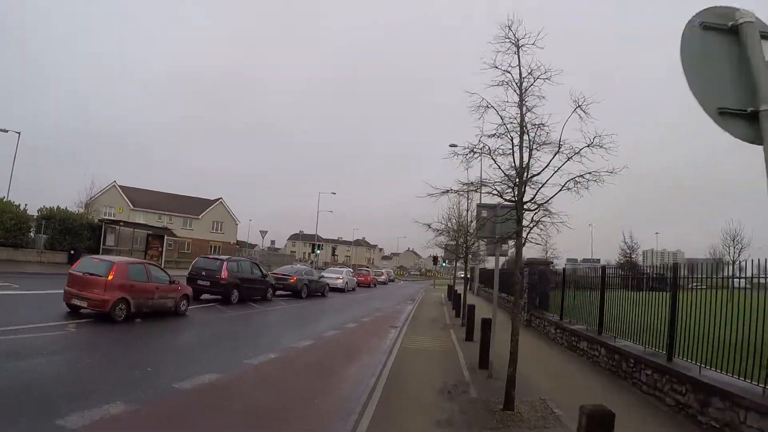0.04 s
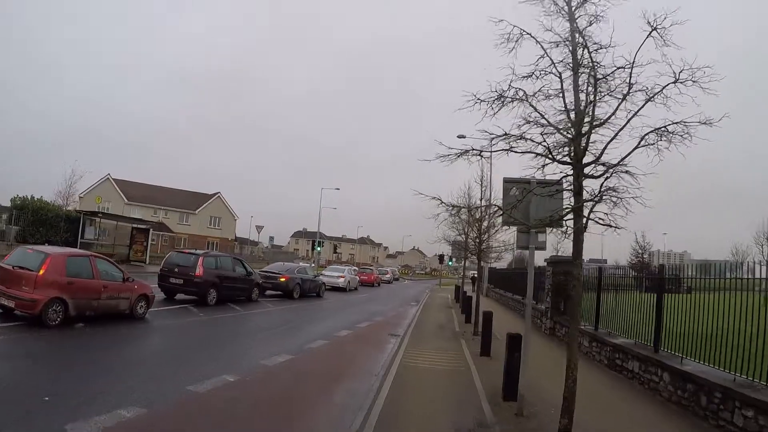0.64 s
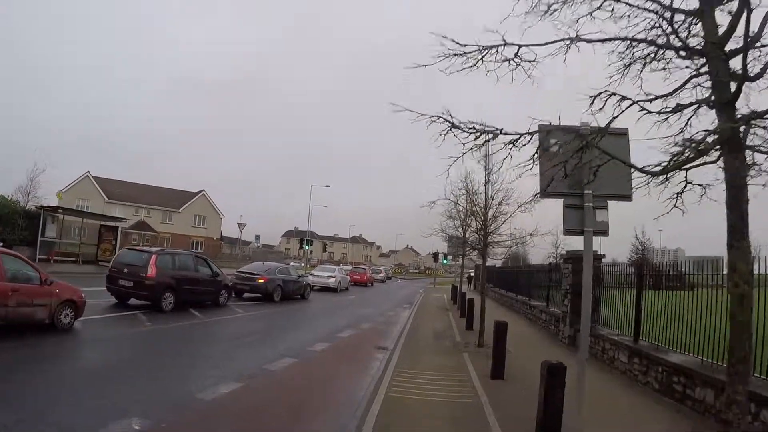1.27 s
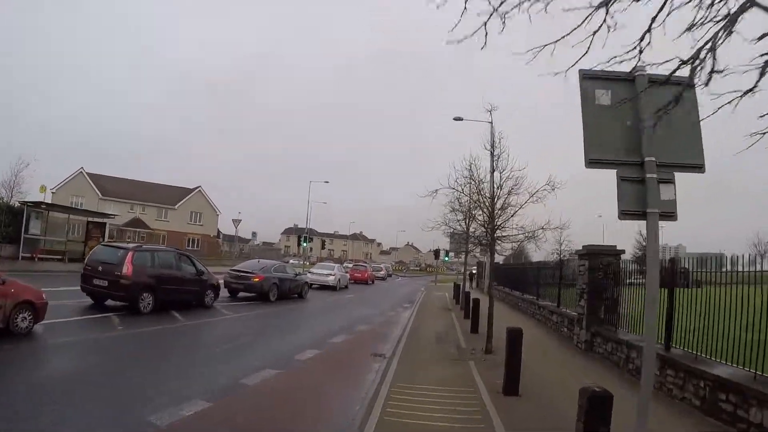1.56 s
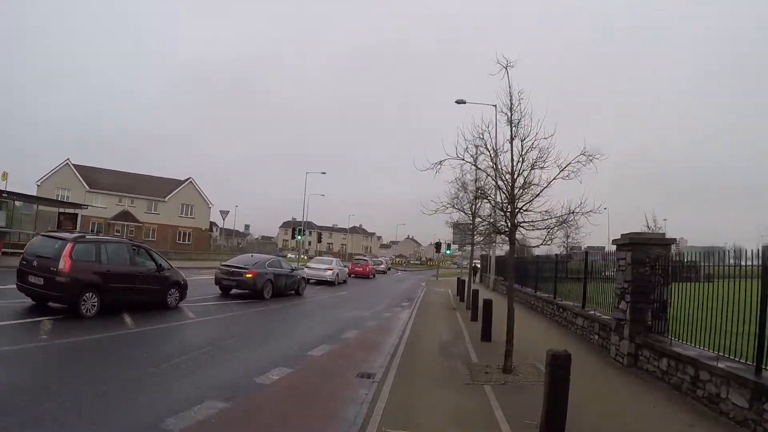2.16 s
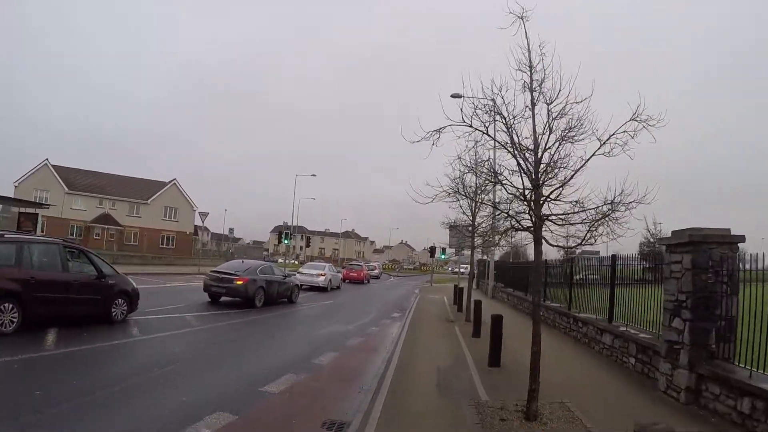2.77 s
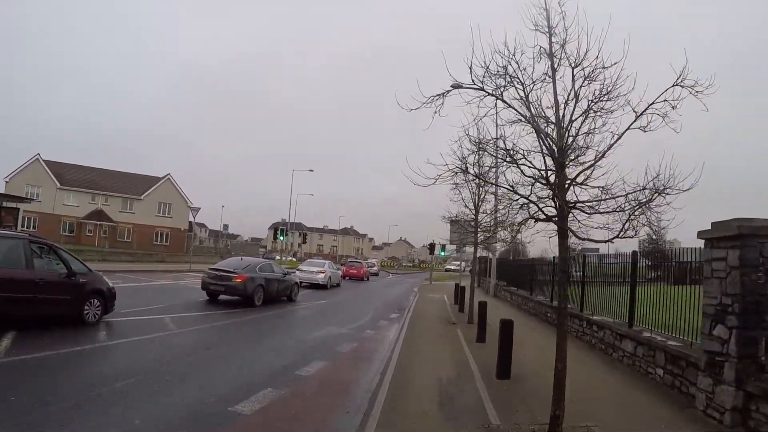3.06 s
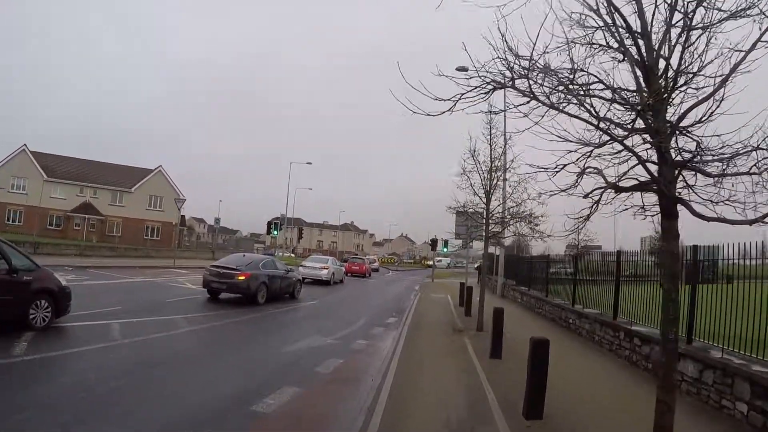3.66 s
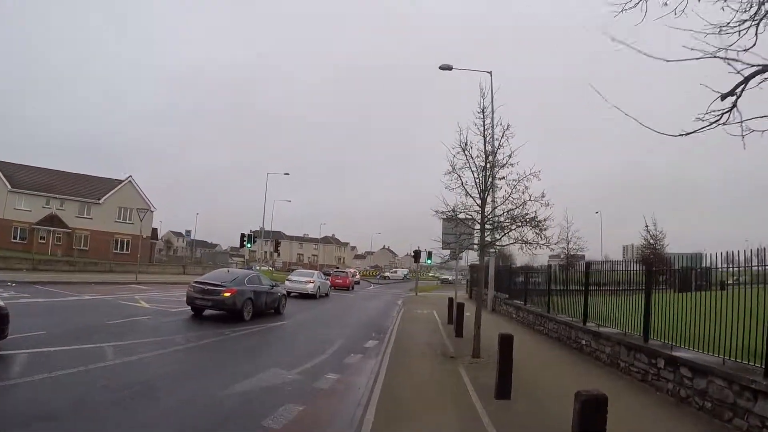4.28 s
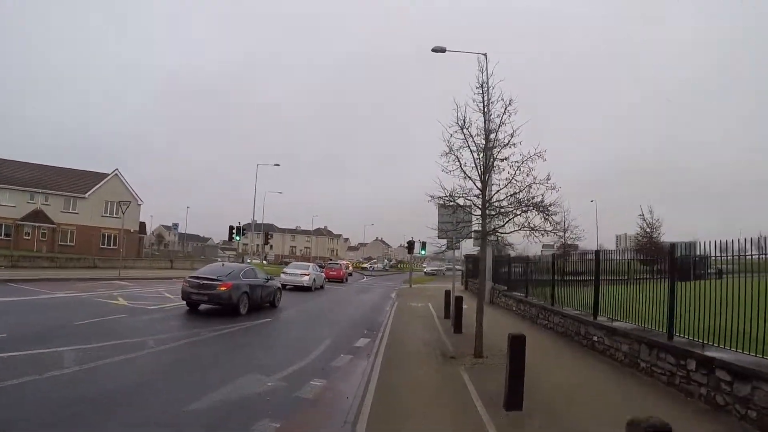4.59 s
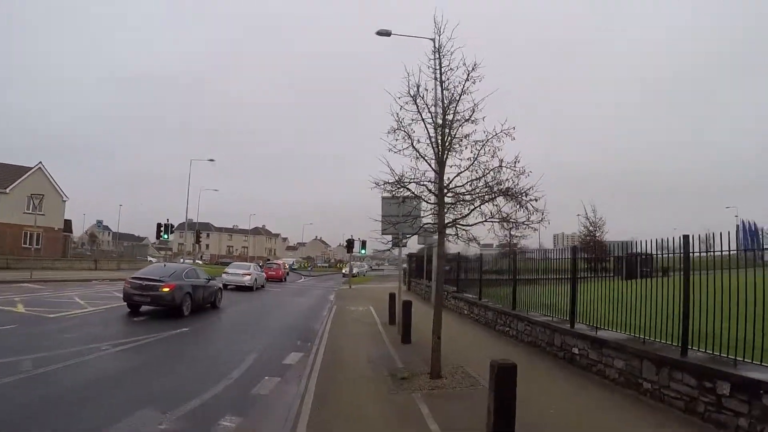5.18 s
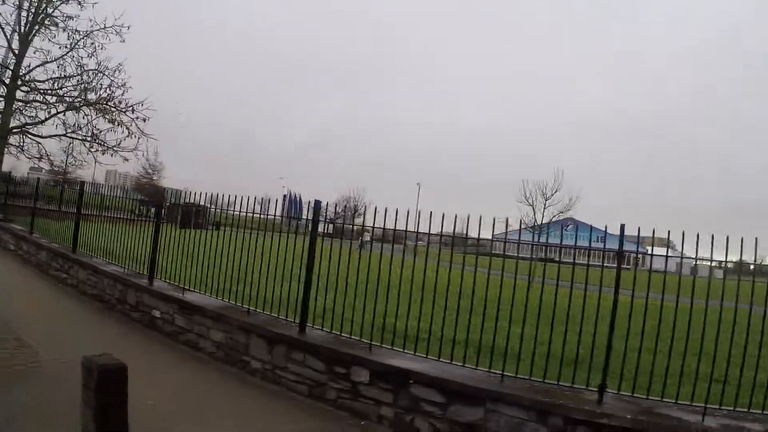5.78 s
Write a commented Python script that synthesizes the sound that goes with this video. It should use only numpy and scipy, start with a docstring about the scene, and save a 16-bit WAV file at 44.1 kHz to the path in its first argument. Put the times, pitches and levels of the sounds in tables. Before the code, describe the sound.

A ride along a cycle path beside a wet street, heard from a camera in a hard housing. Gusty low wind and throbbing engines run throughout, with slightly hollow tyre noise rising and falling from the road. One sharp bicycle click stands out before the middle, then the wind gusts harder. Very faint high pips and small scuffs sit in the background, and a short, low whoosh comes just before the end.

```python
"""Cycling past wet traffic

One microphone, in a camera's hard housing, rides a cycle path past idling cars on a wet road.
Up close, wind buffets the housing over the engines' rumble; from the road, tyres roar, sing and spray,
their noise coloured by the housing's resonances. The bicycle gives one sharp click, faint ticks and
scuffs; thin pips twitter far up in the treble. Near the end, air whooshes low as the camera swings."""
import sys
import numpy as np
from scipy import signal
from scipy.fft import irfft
from scipy.io import wavfile
from scipy.ndimage import uniform_filter1d

SR = 44100
rng = np.random.default_rng(int(sys.argv[2]) if len(sys.argv) > 2 else 0)


def dump(signal):
    """Clip the signal to [-1, 1] and save it as 16-bit WAV at the path in sys.argv[1]."""
    limited = np.clip(np.atleast_2d(signal).T, -1, 1)
    pcm = np.round(limited * 32767).astype(np.int16)
    wavfile.write(sys.argv[1], SR, pcm)


N = 266364
TIME = np.arange(N) / SR
BINS = np.fft.rfftfreq(N, 1 / SR)

# gusts on the housing, before the wind's trim: peak_s, length_s, level_db
HOUSING_GUSTS = [(0.21, 0.28, -43), (0.606, 0.25, -39.5), (1.1, .1, -41.5), (1.392, .12, -40),
                 (1.927, .3, -42.5), (2.712, 0.35, -39.5), (3.3, 0.23, -37), (3.578, .28, -33.7),
                 (3.872, .1, -38.5), (4.729, .13, -38.5), (5.315, .28, -40)]
# idling cars beside the path, before the hum's trim: nearest_s, fall_3db_s, pitch_hz, level_db
IDLING_CARS = [(1.5, 1.0, 149.9, -57.5), (2.1, 0.28, 218.3, -63), (4.45, 0.45, 151.9, -57)]
# engines further up the road, before the hum's trim: pitch_hz, level_db
FAR_ENGINES = [(112, -61), (212, -80), (275, -77.5)]
# cars rolling by, before the tyres' trims: nearest_s, fall_3db_s, roar_db, tread_db, spray_db
PASSING_CARS = [(.06, -0.06, -60.5, -63, -71), (.62, 0.44, -58, -73, -75), (.95, 0.22, -63, -65, -68.5),
                (1.85, 0.39, -62, -66.5, -73), (2.53, .2, -64.5, -56, -80), (2.87, 0.47, -64, -74, -81.5),
                (5.87, 0.23, -75, -62.5, -64)]
# tread blocks singing on the asphalt: loudest_s, fall_3db_s, pitch_hz, level_db
TREAD_SONGS = [(.068, .02, 1233, -55), (.68, 0.36, 1220, -63), (1.1, 0.17, 1770, -65),
               (2.25, 0.22, 1751, -65), (5.75, 0.27, 1162, -66), (5.9, .2, 1764, -66)]
# resonances and hollows of the housing around the microphone: centre_hz, width_hz, gain_db
HOUSING_RESONANCES = [(559, 55, 7), (834, 32, -7), (918, 52, 3.5), (1218, 120, -1.5), (1738, 187, 5.5),
                      (2072, 90, -5.5), (2267, 216, 4), (2683, 184, -5), (2840, 180, 1), (3550, 360, 0.5),
                      (4240, 300, -4), (4525, 400, 5)]
# clicks of the bicycle, close by: start_s, peak_db
BICYCLE_CLICKS = [(2.327, -28.7), (2.713, -48), (4.1301, -51), (4.603, -50)]
# wet grit scuffed under the wheel: peak_s, length_s, centre_hz, width_hz, level_db
GRIT_SCUFFS = [(.15, 0.046, 5400, 2500, -76), (2.083, .02, 4500, 2500, -72), (4.3, 0.046, 3250, 450, -62.5),
               (4.806, 0.028, 3500, 900, -68), (5.39, 0.022, 3750, 600, -64), (5.029, .015, 6500, 600, -76),
               (5.608, 0.035, 6400, 1190, -74)]
# runs of faint, high pips: start_s, end_s, pitch_hz, scatter_hz, pips_per_s, pip_length_s, peak_db
PIP_RUNS = [(0, 0.88, 7900, 140, 43, .012, -81), (.8, 2.7, 7650, 110.6, 15, .012, -81),
            (.1, 1.8, 8950, 220, 14, .012, -80), (2.7, 3.2, 7570, 60, 14, 0.017, -75.5),
            (4.05, 5, 7620, 90, 20, 0.018, -81), (4.099, 5.9, 6470, 280, 26, 0.0031, -79)]
# whine of the camera's electronics: pitch_hz, level_db
CAMERA_WHINE = [(8600, -96.5), (8650, -90), (11800, -105), (14100, -104)]

# spectrum of air swirling at the housing: frequency_hz, relative_db
SWIRL_SPECTRUM = [(4, -22), (12, -2), (28, -3.5), (48, -3.5), (62, -7.5), (85, -15.5), (150, -24.5),
                  (300, -46.5), (800, -77)]
# spectrum of the exhaust rumble: frequency_hz, relative_db
EXHAUST_SPECTRUM = [(20, -5.5), (50, 5), (110, -2.5), (160, -4), (210, -9.5), (260, -15), (330, -18),
                    (420, -25), (520, -32), (700, -32.5), (1500, -57)]
# spectrum of rubber roaring on the road: frequency_hz, relative_db
ROAR_SPECTRUM = [(200, -22.5), (520, -13), (680, -20), (810, -5.5), (950, -0.5), (1230, 1.5), (1400, -2.5),
                 (1600, -14), (2100, -19.5), (2850, -11.5), (3400, -20.5), (6000, -54)]
# spectrum of the ringing tread: frequency_hz, relative_db
TREAD_SPECTRUM = [(900, -42), (1400, -5), (1700, 0), (1850, 0), (2100, -13), (2700, -40), (5000, -62)]
# spectrum of water thrown off the tyres: frequency_hz, relative_db
SPRAY_SPECTRUM = [(500, -17.5), (900, -4.5), (1200, 3.5), (1700, 1), (2300, 5), (2900, -2.5), (3600, -2.5),
                  (4300, -5), (5000, -13.5), (6200, -17.5), (8000, -29.5), (15000, -49)]
# spectrum of the housing rung by a click: frequency_hz, relative_db
CLICK_SPECTRUM = [(400, -32), (900, -12.5), (1800, -19), (2500, -1), (3100, -4), (3550, 3), (3900, -2.5),
                  (4400, -0.5), (5000, -13), (5800, -26.5), (6700, -25.5), (7600, -17), (8500, -23),
                  (9500, -44), (15000, -53)]
# spectrum of the camera's own hiss: frequency_hz, relative_db
HISS_SPECTRUM = [(1000, 4), (5500, -6), (7800, 1.5), (9300, -2), (10300, -0.5), (11000, -4), (13500, -4.5),
                 (15200, -9.5)]


def wind(breeze_db=-46.8, shed_hz=12.6, uneven=0.13, eddy_s=0.0135, eddy_trim_db=1.5, swirl_trim_db=-3.5):
    """Right at the microphone, eddies break off the housing, each a push of pressure, amid finer swirl."""
    gust_power = sum(amp(db) ** 2 * bell(TIME, s, length) for s, length, db in HOUSING_GUSTS)
    wind_db = 10 * np.log10(amp(breeze_db) ** 2 + gust_power)
    cycles = np.cumsum(shed_hz * (1 + uneven * drift(8.46))) / SR
    pushes = np.exp(-((cycles % 1 - .5) / (shed_hz * eddy_s)) ** 2)
    eddies = amp(wind_db + eddy_trim_db) * unit(pushes - pushes.mean())
    # the fine swirl follows the gusts less than the large eddies do
    swirl_db = wind_db.mean() + 0.66 * (wind_db - wind_db.mean())
    return eddies + amp(swirl_db + swirl_trim_db) * coloured_noise(SWIRL_SPECTRUM)


def engines(rumble_db=-50, hum_trim_db=-1):
    """Exhausts rumble steadily; near engines hum louder as the microphone goes by, far ones drone on."""
    near = sum(amp(db) * nearness(s, fall_s) * idle_hum(hz) for s, fall_s, hz, db in IDLING_CARS)
    far = sum(amp(db) * idle_hum(hz) for hz, db in FAR_ENGINES)
    return amp(rumble_db) * coloured_noise(EXHAUST_SPECTRUM) + amp(hum_trim_db) * (near + far)


def idle_hum(pitch_hz, waver=0.01, throb=0.23):
    """The wavering, throbbing note of an idling engine, rms 1."""
    cycles = np.cumsum(pitch_hz * (1 + waver * drift(5.89))) / SR
    return unit(np.sin(2 * np.pi * cycles) * (1 + throb * drift(15.0)))


def tyres(roar_trim_db=-.5, tread_trim_db=-2.5, spray_trim_db=4.0):
    """Out on the road rubber roars, tread rings and sings and the water film hisses, louder when near."""
    _, _, roar_dbs, tread_dbs, spray_dbs = zip(*PASSING_CARS)
    roar = traffic_gain(roar_dbs, far_db=-73.5) * through_housing(ROAR_SPECTRUM, patchy_db=1)
    tread = traffic_gain(tread_dbs, far_db=-66) * through_housing(TREAD_SPECTRUM, patchy_db=1.5)
    spray = traffic_gain(spray_dbs, far_db=-66.5) * through_housing(SPRAY_SPECTRUM, patchy_db=1.22)
    song = sum(amp(db) * nearness(s, fall_s) * noise_band(hz, width_hz=90)
               for s, fall_s, hz, db in TREAD_SONGS)
    return amp(roar_trim_db) * roar + amp(tread_trim_db) * tread + amp(spray_trim_db) * spray + song


def traffic_gain(near_dbs, far_db):
    """Gain of one kind of tyre noise: the steady distant wash and every passing car add in power."""
    near_power = sum((amp(db) * nearness(s, fall_s)) ** 2
                     for (s, fall_s, *_), db in zip(PASSING_CARS, near_dbs))
    return np.sqrt(amp(far_db) ** 2 + near_power)


def through_housing(spectrum, patchy_db, frame=2048, hop=512):
    """Road noise in drifting patches, coloured by the housing on its way to the microphone, rms 1."""
    hz = np.fft.rfftfreq(frame, 1 / SR)
    real, imag, patches = rng.standard_normal((3, N // hop + 5, len(hz)))
    patches = uniform_filter1d(patches, size=6, axis=0)  # smooth in time
    patches = unit(uniform_filter1d(patches, size=16, axis=1))  # and in frequency
    housing_db = sum(db * bell(hz, centre, width) for centre, width, db in HOUSING_RESONANCES)
    frames = (real + 1j * imag) * amp(spectrum_db(spectrum, hz) + housing_db + patchy_db * patches)
    _, road = signal.istft(frames.T, nperseg=frame, noverlap=frame - hop)
    return unit(road[:N])


def whoosh(start_s=5.65, length_s=0.227, attack_s=0.055, release_s=0.044, level_db=-39.3):
    """Air hoots past the turning housing inside a low puff, its pitch sagging ever faster."""
    pitch_hz = 110.5 - 32 * ramp(start_s, length_s) ** 3.66
    envelope = ramp(start_s, attack_s) * (1 - ramp(start_s + length_s - release_s, release_s))
    roughness = 1 + 0.18 * drift(32)
    hoot = unit(np.sin(2 * np.pi * np.cumsum(pitch_hz) / SR) * roughness)
    puff = amp(-11) * noise_band(pitch_hz, width_hz=90)
    return amp(level_db) * envelope * (hoot + puff)


def clicks(grit_per_s=30, grit_db=-65, spread_db=2, rattle_db=-30, rattle_s=0.0074, size=2048):
    """Bicycle clicks and tiny grit strikes ring the housing; its mount rattles briefly after each."""
    hz = abs(np.fft.fftfreq(size, 1 / SR))
    log_gain = np.log(amp(spectrum_db(CLICK_SPECTRUM, hz)))
    ring = np.fft.ifft(np.exp(np.conj(signal.hilbert(log_gain)))).real  # minimum phase: a sharp onset
    rattle = amp(rattle_db) * rng.standard_normal(size) * np.exp(-TIME[:size] / rattle_s)
    ring = ring + signal.fftconvolve(ring, rattle)[:size]
    grit_hits = rng.random(N) < grit_per_s / SR
    blows = grit_hits * amp(grit_db + spread_db * np.minimum(rng.exponential(1, N), 3))
    for start_s, peak_db in BICYCLE_CLICKS:
        blows[round(start_s * SR)] += amp(peak_db)
    return signal.oaconvolve(blows, ring / abs(ring).max())[:N]


def scuffs():
    """Wet grit scuffs under the wheel in short, soft puffs of hiss."""
    return sum(amp(db) * bell(TIME, s, length) * noise(bell(BINS, hz, width))
               for s, length, hz, width, db in GRIT_SCUFFS)


def sizzle(start_s=2.9, rise_s=1.1, centre_hz=3507, width_hz=830, level_db=-74, splutter_db=3):
    """Water splutters finely under a wheel close by, setting in and staying."""
    envelope = amp(level_db) * ramp(start_s, rise_s)
    return envelope * noise_band(centre_hz, width_hz) * unit(amp(splutter_db * drift(24)))


def twitter(jitter_s=.016, spread_db=1.5):
    """Faint runs of high pips in the background, each a little off in time, pitch and strength."""
    pips = np.zeros(N)
    for start_s, end_s, pitch_hz, scatter_hz, pips_per_s, length_s, peak_db in PIP_RUNS:
        chance = rng.standard_normal((64, 3))
        for s, (late, sharp, strong) in zip(np.arange(start_s, end_s, 1 / pips_per_s), chance):
            span = slice(*np.searchsorted(TIME, [s - .06, s + .06]))
            t = TIME[span] - s - jitter_s * late
            envelope = amp(peak_db + spread_db * strong) * bell(t, 0, length_s)
            pips[span] += envelope * np.sin(2 * np.pi * (pitch_hz + scatter_hz * sharp) * t)
    return pips


def nearness(nearest_s, fall_3db_s):
    """Gain 1 / distance of a source passing the microphone in a straight line, 1 at its nearest."""
    return 1 / np.hypot(1, (TIME - nearest_s) / fall_3db_s)


def noise(gain):
    """Steady noise shaped by a gain for each frequency bin, rms 1."""
    real, imag = rng.standard_normal((2, len(BINS)))
    return unit(irfft((real + 1j * imag) * gain, N))


def coloured_noise(spectrum):
    """Steady noise shaped by a spectrum table, rms 1."""
    return noise(amp(spectrum_db(spectrum, BINS)))


def noise_band(centre_hz, width_hz):
    """A fuzzy band of noise around a steady or moving pitch, rms 1."""
    phase = 2 * np.pi * np.cumsum(centre_hz * np.ones(N)) / SR
    return unit(drift(width_hz / 2) * np.sin(phase) + drift(width_hz / 2) * np.cos(phase))


def drift(rate_hz):
    """Random wandering, mostly slower than rate_hz, rms 1."""
    return noise(bell(BINS, 0, 2 * rate_hz))


def spectrum_db(spectrum, hz):
    """A spectrum table read on a log-frequency axis."""
    points_hz, points_db = np.transpose(spectrum)
    return np.interp(np.log(hz + 1), np.log(points_hz + 1), points_db)


def bell(x, centre, width):
    """A bell of height 1 and the given full width at half height."""
    return 2 ** -((2 * (x - centre) / width) ** 2)


def ramp(start_s, length_s):
    """Rises from 0 to 1 and stays there."""
    return np.clip((TIME - start_s) / length_s, 0, 1)


def amp(db):
    """Decibels to gain."""
    return 10 ** (np.asarray(db) / 20)


def unit(x):
    """Scales to rms 1."""
    return x / np.sqrt(np.mean(x ** 2) + 1e-20)


def scene():
    """Everything that reaches the one microphone on the bicycle."""
    return (wind() + engines() + tyres() + sizzle() + clicks() + scuffs() + twitter() + whoosh())[None]


def record(dry, hiss_db=-77, cutoff_hz=15250):
    """The camera adds its own hiss and whine and cuts the top of the treble."""
    hiss = amp(hiss_db) * coloured_noise(HISS_SPECTRUM)
    whine = sum(amp(db) * unit(np.sin(2 * np.pi * hz * TIME)) for hz, db in CAMERA_WHINE)
    fade = ramp(0, .002)  # keeps the ends from clicking
    faded = (dry + hiss + whine) * fade * fade[::-1]
    lowpass = signal.firwin(801, cutoff_hz, window=("kaiser", 9), fs=SR)
    return signal.oaconvolve(faded, lowpass[None], "same", axes=1)


dry = scene()
out = record(dry)
dump(out)
```